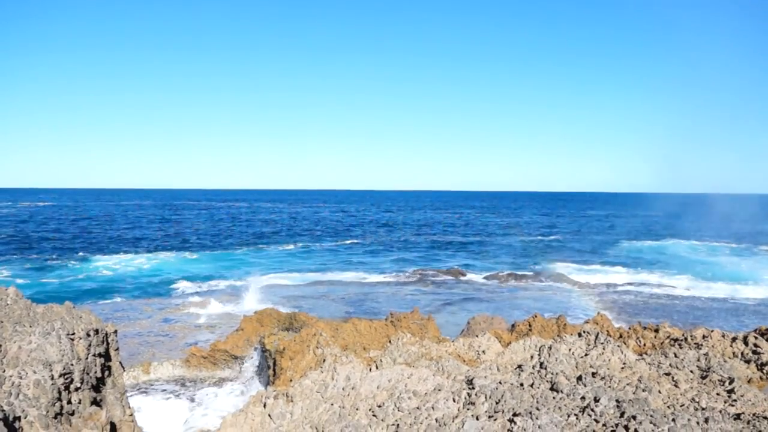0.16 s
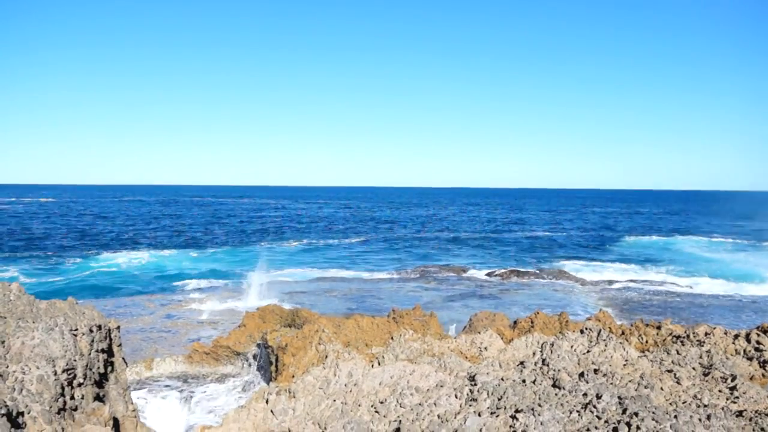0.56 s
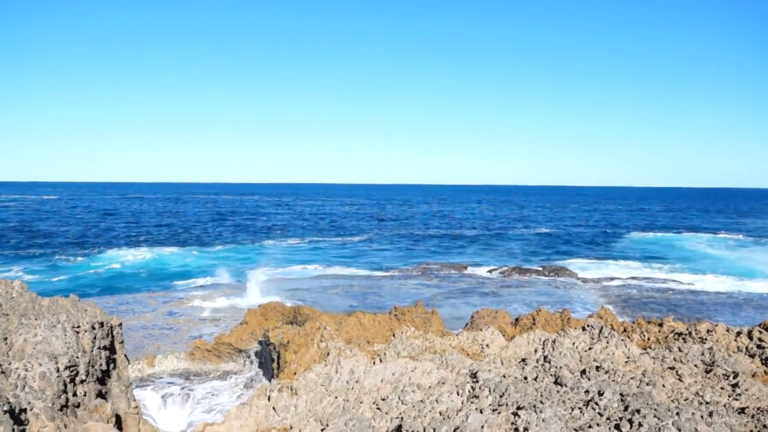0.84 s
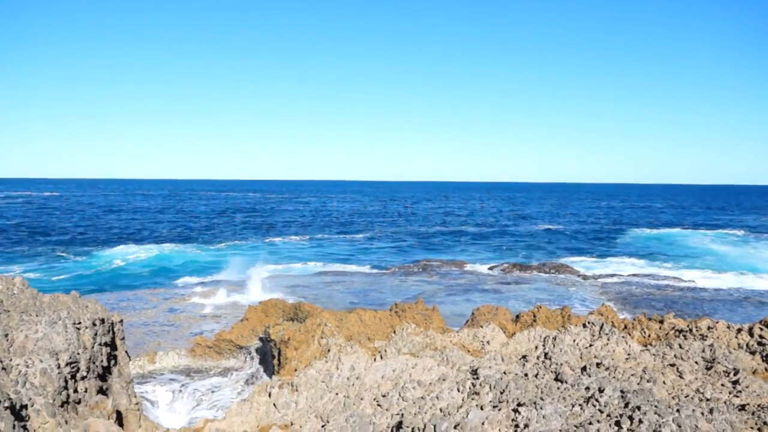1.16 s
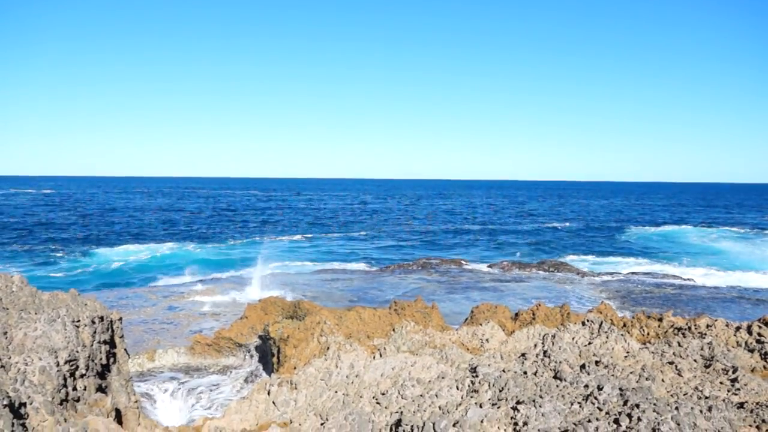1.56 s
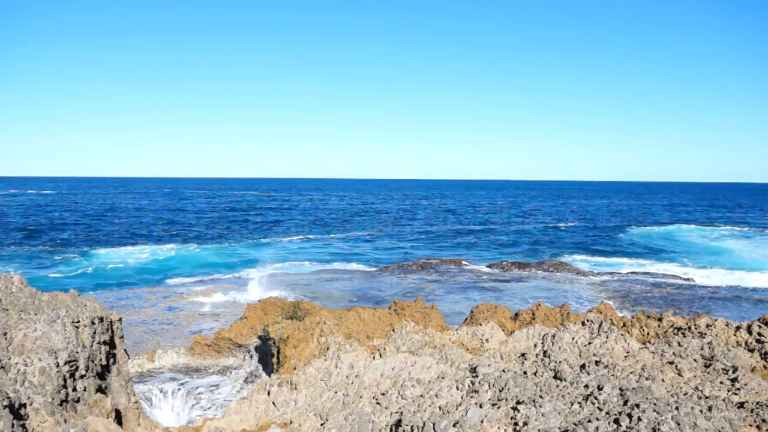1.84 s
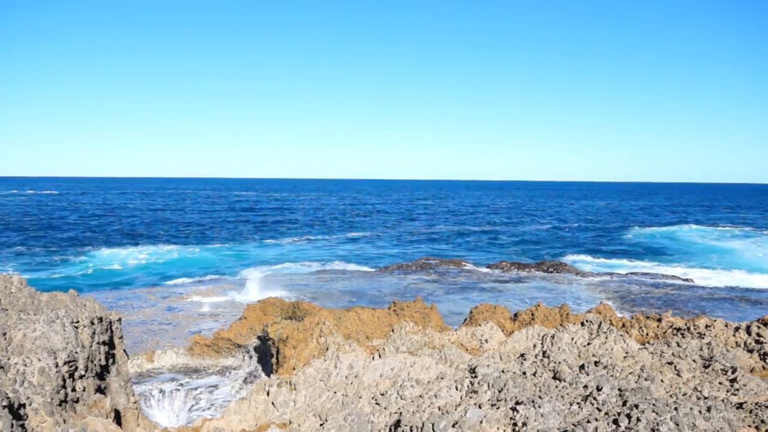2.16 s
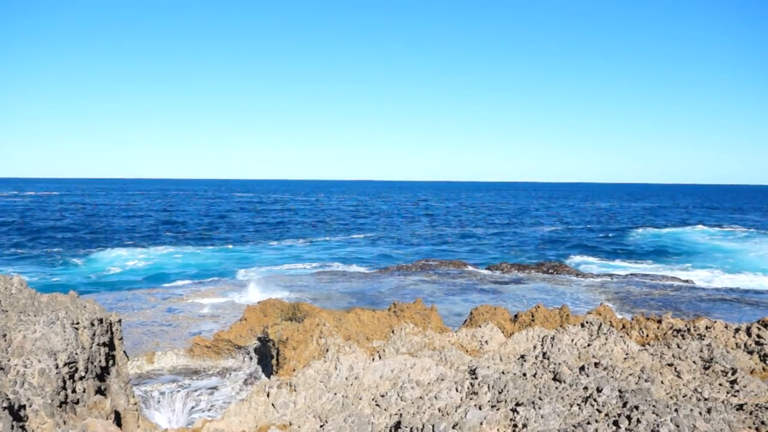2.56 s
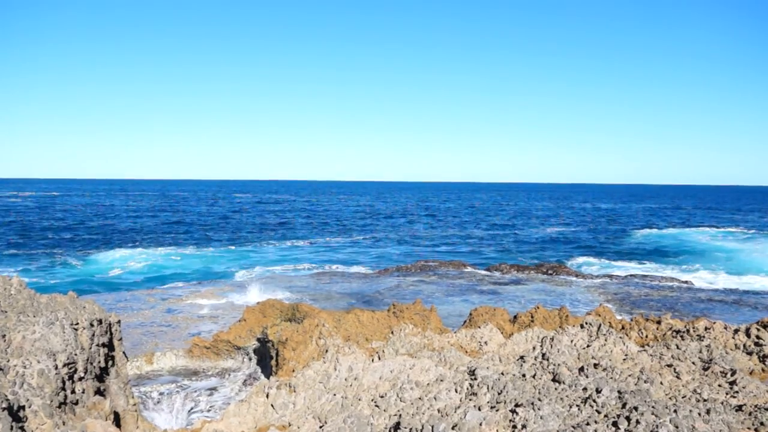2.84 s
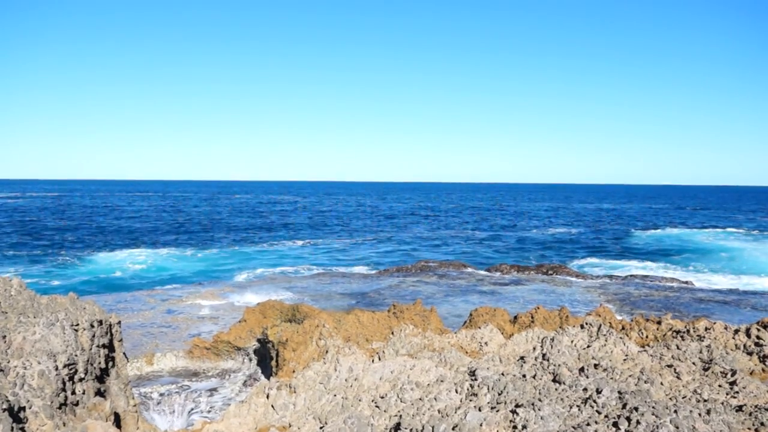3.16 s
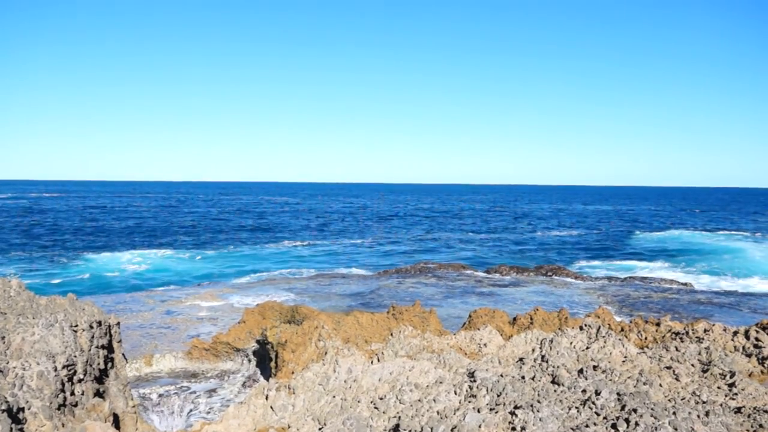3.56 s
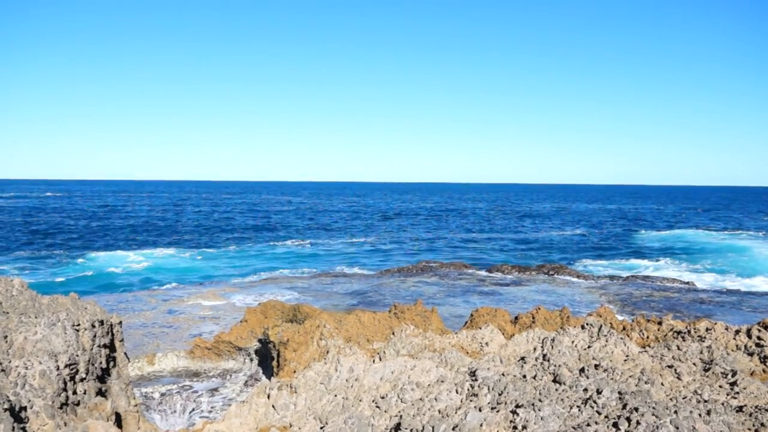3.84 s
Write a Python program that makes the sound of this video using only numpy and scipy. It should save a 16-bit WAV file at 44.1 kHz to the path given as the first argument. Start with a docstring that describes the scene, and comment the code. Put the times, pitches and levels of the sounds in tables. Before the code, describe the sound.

Gusty wind rumbles and thumps on the microphone while surf rushes on a rocky shore

```python
"""On a rocky shelf, surf churns ahead while the spray of a broken wave rains down and thins out.
Sea sounds are coloured noise under slow level curves; one jet of water swells up through the shelf.
Wind at the two microphone ports is fluttering noise: thump, rumble and roar, with short buffets and slaps.
In the last second it blows hard: the rumble brightens and tears into a crackle of noise ticks and spits,
and the hiss sinks away under it."""
import sys
import numpy as np
from scipy import signal
from scipy.fft import rfft, irfft, next_fast_len
from scipy.io import wavfile
from scipy.ndimage import uniform_filter1d, map_coordinates

SR = 44100
rng = np.random.default_rng(int(sys.argv[2]) if len(sys.argv) > 2 else 0)


def log_audio(samples):
    """Write samples as a 16-bit WAV file to the path given in sys.argv[1]."""
    # one column per channel
    frames = np.atleast_2d(samples).T
    # limit to full scale, then quantise
    limited = np.clip(frames, -1, 1)
    pcm = np.round(limited * 32767).astype(np.int16)
    wavfile.write(sys.argv[1], SR, pcm)


N = 176400

# surf on the shelf, before the left-right balance: [t/s, level/dB]
SURF_LEVEL = [(0, -35), (.3, -36.5), (.7, -37.5), (1.2, -37), (1.65, -37.5), (2.1, -38.5), (2.8, -38.5),
              (3.2, -40.5), (3.5, -43), (4, -38)]
# hiss of spray and foam, before HISS_LIFT_DB and the left-right balance: [t/s, level/dB]
HISS_LEVEL = [(0, -49), (.18, -49.3), (.26, -52.5), (.35, -50), (.43, -53.5), (.52, -51), (.76, -55.7),
              (1.24, -52.5), (1.42, -56.7), (1.5, -56.5), (1.57, -53.5), (2.1, -56), (2.15, -58.5),
              (2.28, -55.3), (3.1, -56.8), (3.21, -60.5), (3.24, -66), (3.28, -62.5), (3.38, -61),
              (3.42, -66.5), (3.58, -65), (3.64, -69.5), (3.72, -66.5), (4, -63.5)]
HISS_LIFT_DB = 6.5
# spectra of surf, hiss and the jet of water, in relative level: [f/Hz, level/dB per Hz]
SURF_COLOUR = [(40, -33), (150, 5), (400, 0), (550, 1), (820, 0.5), (1300, -2.5), (2000, -5.5), (3000, -14),
               (4500, -16.5), (9000, -56)]
HISS_COLOUR = [(1000, -24), (2200, 2), (3000, 4), (4250, 4), (4700, -9), (5250, -4), (6500, 0.5), (7900, 0),
               (9000, -4.5), (10300, -7), (11900, -12), (13300, -11.5), (14800, -10), (16000, -14)]
SPOUT_COLOUR = [(1200, -8.5), (2500, -21), (3400, 7), (4300, 5), (4900, -9), (7000, -26), (12000, -24)]
# likeness of the sea at left and right, clipped to -1..1 in use: [f/Hz, correlation/1]
SEA_ALIKE = [(100, 1), (450, -1.32), (800, 0.9), (1700, 0.82), (3000, 0.61), (4200, 0.92), (4700, 0.32),
             (5250, -0.34), (6400, 0.9), (8200, 0.75), (11500, 0.0031), (13500, .6), (16000, 0.57)]
SEA_PAN_DB = 0.5  # left minus right
# a jet of water bursts up through the shelf: middle, half length, level at its height
SPOUT_S, SPOUT_HALF_S, SPOUT_DB = 1.43, 0.42, -52
SPOUT_FLUTTER_DB = 1.8

# strength of the wind on the microphone: [t/s, level/dB]
WIND_STRENGTH = [(0.0, -24.5), (0.02, -26.5), (0.05, -38), (0.23, -34), (0.25, -39), (0.275, -50),
                 (0.29, -34), (0.41, -34.5), (0.48, -23.5), (0.54, -26), (0.58, -30), (0.62, -29.5),
                 (0.67, -30), (0.683, -45), (0.715, -44), (0.76, -36.5), (0.77, -33), (0.79, -32.5),
                 (0.85, -24.5), (0.89, -29), (0.96, -26), (1.0, -33), (1.18, -30), (1.21, -24), (1.25, -27),
                 (1.3, -23.5), (1.33, -25.5), (1.38, -23), (1.43, -26.5), (1.48, -26), (1.53, -25),
                 (1.55, -34), (1.58, -32.5), (1.61, -29.5), (1.75, -28.5), (1.85, -31.5), (1.87, -35.5),
                 (2.05, -25), (2.1, -28), (2.14, -25.5), (2.21, -31.5), (2.25, -27), (2.37, -32),
                 (2.42, -26), (2.44, -33), (2.52, -26), (2.57, -34), (2.6, -31.5), (2.78, -36.5),
                 (2.82, -31), (2.92, -34), (2.97, -22.5), (3.04, -21.5), (3.05, -27.5), (3.12, -23),
                 (3.14, -20), (3.17, -22.5), (3.19, -19), (3.31, -22.5), (3.34, -24), (3.39, -19),
                 (3.49, -22.5), (3.63, -19.5), (3.65, -26.5), (3.72, -22.5), (4.0, -21)]
# level of the wind's roar over what its strength gives: [t/s, level/dB]
BRIGHTNESS = [(0, -0.5), (.5, 2.5), (.72, -4), (.9, -1.5), (1.15, -3.5), (1.38, 3.5), (1.7, 0.5),
              (2.2, 0.5), (2.5, -0.5), (2.8, -7), (3.1, 2.5), (3.35, 4), (3.7, 8), (4, 4)]
# relative spectra of the wind layers; the rumble's before its pitch climbs: [f/Hz, level/dB per Hz]
THUMP_COLOUR = [(15, 3), (40, -13), (70, -16), (140, -24), (500, -66)]
RUMBLE_COLOUR = [(20, -55), (50, -28.5), (80, -17), (130, -7), (210, 2), (320, 3), (470, -1), (650, -10.5),
                 (1000, -43.5), (2000, -54), (5000, -94)]
ROAR_COLOUR = [(120, -38), (300, -1), (470, 0.5), (620, 1), (780, -2.5), (1050, -7.5), (1450, -15.5),
               (2200, -23.5), (4000, -40.5), (8000, -68)]
# likeness of the wind at the two ports: [f/Hz, correlation/1]
THUMP_ALIKE = [(40, -0.7)]
RUMBLE_ALIKE = [(50, 0.45), (130, 0.82), (280, 0.78), (450, 0.086), (700, 0.033)]
ROAR_ALIKE = [(300, 0.8), (600, 0.13), (1100, -0.32), (2500, -0.52), (6000, -.15)]
# wind layers: level at wind strength REF_DB and brightness 0, dB per dB of wind, depth of flutter
REF_DB = -22
THUMP_DB, THUMP_GROWS, THUMP_FLUTTER_DB = -50, 1.7, 4
RUMBLE_DB, RUMBLE_GROWS, RUMBLE_FLUTTER_DB = -20.5, 1, 3.5
ROAR_DB, ROAR_GROWS, ROAR_FLUTTER_DB = -28.5, 1.3, 2.5
THUMP_FLUTTER_HZ, FLUTTER_HZ = 11, 110.2  # random level knots a second; the second for rumble and roar
THINNING = 0.44  # dB that thump and rumble give up for each dB of brightness
RISE = .028  # octaves that the rumble climbs for each dB of brightness

# lumps of air that strike the microphone: [t/s, level/dB, half length/s, roar over rumble/dB]
BUFFETS = [(.492, -23, 0.028, -15), (0.538, -24.5, 0.018, -10), (0.606, -24.5, 0.017, -3),
           (0.845, -21, .012, -12), (0.924, -22, 0.0075, 0), (.96, -21, .008, -3.5),
           (1.281, -21.5, 0.016, -13), (1.304, -21, 0.013, -1), (1.362, -18, 0.0067, -1),
           (1.378, -15.5, 0.014, -8), (1.507, -21, 0.0099, -2), (2.04, -23, .012, -5),
           (2.131, -18, 0.0087, -3.5), (2.151, -22, 0.017, -5), (2.234, -21.5, 0.0097, -4),
           (2.256, -26, 0.0083, 2), (2.487, -26.5, 0.015, 6), (2.518, -21.5, 0.019, -12.5),
           (2.809, -28, .013, -3.5), (2.97, -22, 0.008, -2), (3.137, -14.5, 0.006, -1.5),
           (3.192, -25.5, 0.0076, 8), (3.223, -21, .018, 8), (3.29, -19, 0.01, 4), (3.322, -19.5, .007, 5),
           (3.405, -19.5, 0.011, 5), (3.453, -22.5, 0.021, 3), (3.549, -20.5, .01, -3),
           (3.612, -19.5, 0.0066, 15), (3.669, -21.5, 0.0072, 16), (3.748, -19.5, 0.01, 7),
           (3.851, -17.5, 0.0047, 4), (3.9, -21, 0.018, 2)]
BUFFET_HOLD_S = .012
# single eddies that slap a port: [t/s, peak level at the louder port/dB, left minus right/dB, f/Hz]
SLAPS = [(1.199, -13.5, 12, 577), (1.304, -11, -2, 510), (1.379, -4.5, 24, 590), (1.4473, -10, 5, 280),
         (3.131, -6, 27, 370)]

# bed of ticks in the crackle, before the left-right balance: [t/s, level/dB]
CRACKLE_LEVEL = [(0, -61), (2.9, -50), (3.23, -57), (3.27, -43), (3.4, -44.5), (3.42, -47), (3.44, -42.5),
                 (3.48, -40), (3.51, -47), (3.56, -44), (3.6, -36), (3.65, -42), (3.68, -43), (3.72, -37.5),
                 (3.76, -37), (3.8, -40), (3.88, -36), (3.92, -38.5), (3.96, -33.5), (4, -37)]
# relative spectrum of the ticks, before their random patches: [f/Hz, level/dB per Hz]
CRACKLE_COLOUR = [(500, -12), (1100, 15), (1600, 1.5), (2300, 6.5), (3300, 1), (4700, -4.5), (5600, -7.5),
                  (7000, -18), (10000, -40), (16000, -53.5)]
CRACKLE_PAN_DB = 4.5  # left minus right, ticks only
TICK_DB, TICKS_HZ = 3.8, 520  # depth of the ticks and random knots a second
CRACKLE_PATCH_HZ, CRACKLE_PATCH_S, CRACKLE_FLUTTER_DB = 2600, .0012, 2.6
# strongest spits, each a random burst of nominal level: [t/s, level/dB, centre f/Hz, left minus right/dB]
SPITS = [(3.136, -41, 2600, 4), (3.258, -36, 3300, 3), (3.333, -37, 3400, 5), (3.362, -41, 2700, -2),
         (3.403, -35.5, 2500, -5), (3.472, -39, 3800, 3), (3.579, -42, 4200, 0), (3.591, -40, 3800, 2),
         (3.613, -38, 3200, -1), (3.633, -40, 4100, 4), (3.667, -37, 3200, 3), (3.749, -31.5, 2100, -5),
         (3.784, -40, 3300, 1), (3.818, -34.5, 3250, 0), (3.843, -34, 1900, -1), (3.863, -40, 4600, 4),
         (3.875, -37.5, 3200, 2), (3.891, -33, 3500, 2), (3.946, -35.5, 3700, 2), (3.961, -35, 3300, 1),
         (3.973, -34, 2900, 3)]
SPIT_S, SPIT_KNOTS_HZ = .0036, 3300  # half length; random knots a second, which set the bandwidth

TOP_HZ = 15800


def amp(db):
    """Decibels to gain."""
    return 10 ** (np.asarray(db) / 20)


def unit(x):
    """Scale to rms 1."""
    return x / np.sqrt(np.mean(x ** 2) + 1e-20)


def along(points, hz):
    """Read (f/Hz, value) points on a log axis."""
    f, v = np.transpose(points)
    return np.interp(np.log(hz + 1), np.log(f + 1), v)


def curve(rows):
    """Turn (t/s, value) points into one value per sample."""
    return np.interp(np.arange(N) / SR, *np.transpose(rows))


def wobble(rate):
    """A smooth random curve, rate knots a second."""
    knots = rng.standard_normal(N // 20)
    return map_coordinates(knots, [np.arange(N) * rate / SR], mode="mirror")


def pan(db):
    """Left and right gains for a level difference."""
    return amp(np.array([[db], [-db]]) / 2)


def filtered(x, response):
    """Multiply the spectrum of x by a response of frequency."""
    m = next_fast_len(N + SR // 2)
    return irfft(rfft(x, m) * response(np.fft.rfftfreq(m, 1 / SR)), m)[..., :N]


def rush(colour, alike, swing_db):
    """Stereo noise of rms 1: white noise swells by swing_db and is then coloured."""
    def mid_side_response(hz):
        # mid and side shares that give the wanted left-right correlation
        angle = np.arccos(np.clip(along(alike, hz), -1, 1)) / 2
        return amp(along(colour, hz)) * [np.cos(angle), np.sin(angle)]

    white = rng.standard_normal((2, N)) * amp(swing_db)
    mid, side = filtered(white, mid_side_response)
    return unit(np.array([mid + side, mid - side]))


def eddies(colour, alike, depth_db, rate, hold_s):
    """Fluttering noise whose mean strength stays even over spans longer than hold_s."""
    x = rush(colour, alike, depth_db * wobble(rate))
    power = uniform_filter1d(np.mean(x ** 2, axis=0), max(int(hold_s * SR), 2))
    return x / np.sqrt(np.abs(power) + 1e-9)


def quickened(x):
    """Faster air sheds faster eddies: the pitch of x climbs with the brightness of the wind."""
    place = np.cumsum(2 ** (RISE * curve(BRIGHTNESS)))
    return np.array([map_coordinates(port, [place], mode="mirror") for port in x])


def patchy(x, depth_db, width_hz, length_s):
    """Random gain in time-frequency patches of a given half width and half length, then rms 1."""
    hz, t, z = signal.stft(x, SR, nperseg=128)
    across = np.exp(-((hz - hz.mean()) / width_hz) ** 2)
    lengthwise = np.exp(-((t[:31] - t[15]) / length_s) ** 2)
    blob = np.outer(across, lengthwise)
    field = unit(signal.fftconvolve(rng.standard_normal(z.shape[1:]), blob, "same"))
    gain = amp(depth_db * np.clip(field, -2, 2))
    return unit(signal.istft(z * gain, nperseg=128)[1][:, :N])


def surf():
    """Churning white water: broad noise with a slow, slight swell."""
    return amp(curve(SURF_LEVEL)) * rush(SURF_COLOUR, SEA_ALIKE, 0.37 * wobble(15))


def spray():
    """Spray and foam on the rocks: finer hiss with a slow swell and a fast grain."""
    swing_db = .5 * wobble(36.1) + 1.1 * wobble(900)
    return amp(curve(HISS_LEVEL) + HISS_LIFT_DB) * rush(HISS_COLOUR, SEA_ALIKE, swing_db)


def spout():
    """A jet of water bursts up through the shelf: fluttering noise that swells and sinks once."""
    swell = np.exp(-((np.arange(N) / SR - SPOUT_S) / SPOUT_HALF_S) ** 2)
    return amp(SPOUT_DB) * swell * rush(SPOUT_COLOUR, SEA_ALIKE, SPOUT_FLUTTER_DB * wobble(31.1))


def sea():
    """Surf, spray and spout share one left-right balance."""
    return pan(SEA_PAN_DB) * (surf() + spray() + spout())


def wind():
    """One strength drives thump, rumble and roar; brightness shifts the weight towards the roar."""
    gust_db, bright_db = curve(WIND_STRENGTH) - REF_DB, curve(BRIGHTNESS)
    thump = eddies(THUMP_COLOUR, THUMP_ALIKE, THUMP_FLUTTER_DB, THUMP_FLUTTER_HZ, hold_s=.4)
    thump = amp(THUMP_DB + THUMP_GROWS * gust_db) * thump
    rumble = quickened(eddies(RUMBLE_COLOUR, RUMBLE_ALIKE, RUMBLE_FLUTTER_DB, FLUTTER_HZ, hold_s=0.025))
    rumble = amp(RUMBLE_DB + RUMBLE_GROWS * gust_db) * rumble
    roar = eddies(ROAR_COLOUR, ROAR_ALIKE, ROAR_FLUTTER_DB, FLUTTER_HZ, hold_s=0.066)
    roar = amp(ROAR_DB + ROAR_GROWS * gust_db) * roar
    return amp(-THINNING * bright_db) * (thump + rumble) + amp(bright_db) * roar


def buffets():
    """Each buffet is a brief swell of rumble and roar in the colours of the wind."""
    t, out = np.arange(N) / SR, np.zeros((2, N))
    rumble = quickened(eddies(RUMBLE_COLOUR, RUMBLE_ALIKE, 0, FLUTTER_HZ, BUFFET_HOLD_S))
    roar = eddies(ROAR_COLOUR, ROAR_ALIKE, 0, FLUTTER_HZ, BUFFET_HOLD_S)
    for s, db, half_s, roar_db in BUFFETS:
        near = np.abs(t - s) < 4 * half_s
        swell = np.exp(-((t[near] - s) / half_s) ** 2)
        # roar_db sets the colour only, db the level
        air = (rumble[:, near] + amp(roar_db) * roar[:, near]) / np.hypot(1, amp(roar_db))
        out[:, near] += amp(db) * swell * air
    return out


def slaps():
    """Each eddy is one brief push of pressure between two shallow dips."""
    t, out = np.arange(N) / SR, np.zeros((2, N))
    for s, db, side_db, hz in SLAPS:
        u = (np.pi * hz * (t - s)) ** 2
        push = (1 - 2 * u) * np.exp(-u)
        sides = pan(side_db) / pan(side_db).max()
        out += sides * amp(db) * push
    return out


def crackle():
    """Fast air tears at the port edges: a bed of ticks, and short spits each with a pitch and side."""
    t = np.arange(N) / SR
    ticks = rush(CRACKLE_COLOUR, ROAR_ALIKE, TICK_DB * wobble(TICKS_HZ))
    ticks = patchy(ticks, CRACKLE_FLUTTER_DB, CRACKLE_PATCH_HZ, CRACKLE_PATCH_S)
    out = pan(CRACKLE_PAN_DB) * amp(curve(CRACKLE_LEVEL)) * ticks
    # complex noise, shifted up to the pitch of each spit
    noise = np.array([wobble(SPIT_KNOTS_HZ) + 1j * wobble(SPIT_KNOTS_HZ) for port in range(2)])
    for s, db, hz, side_db in SPITS:
        near = np.abs(t - s) < 4 * SPIT_S
        u = t[near] - s
        pitched = np.real(noise[:, near] * np.exp(2j * np.pi * hz * u))
        burst = np.exp(-(u / SPIT_S) ** 2) * pitched
        out[:, near] += unit(pan(side_db)) * amp(db) * burst
    return out


def scene():
    """The sea ahead, the wind at the microphone."""
    return sea() + wind() + buffets() + slaps() + crackle()


def record(dry):
    """The camera keeps nothing above its band limit."""
    return filtered(dry, lambda hz: hz < TOP_HZ)


dry = scene()
out = record(dry)
log_audio(out)
```